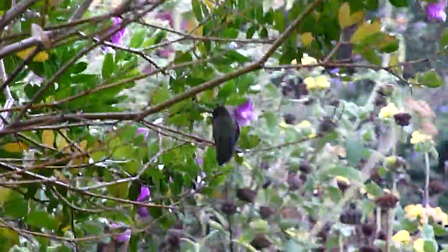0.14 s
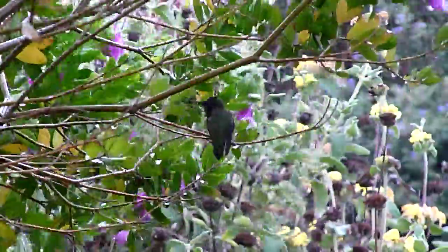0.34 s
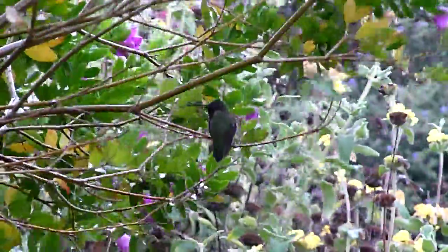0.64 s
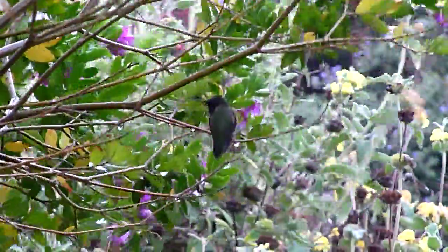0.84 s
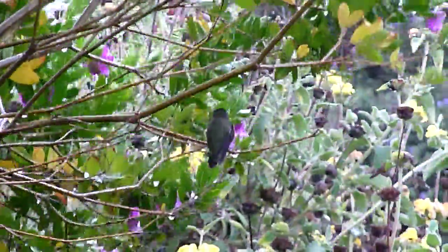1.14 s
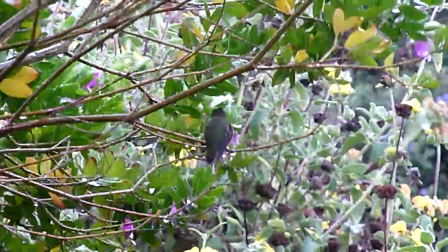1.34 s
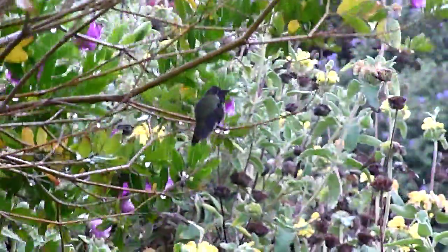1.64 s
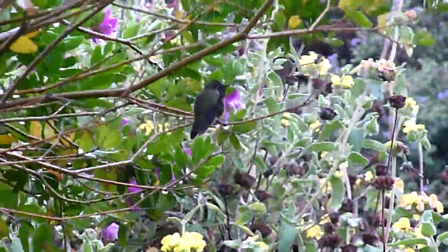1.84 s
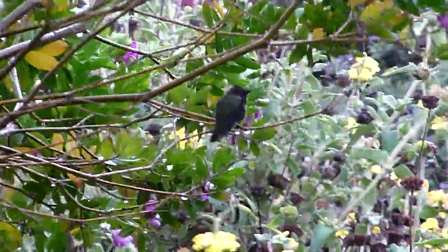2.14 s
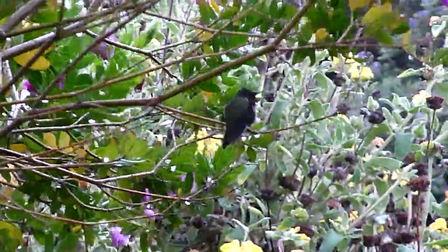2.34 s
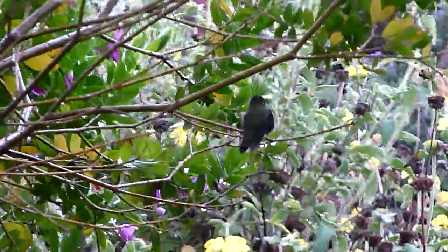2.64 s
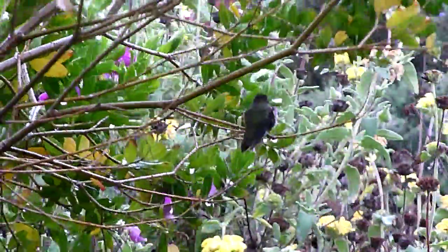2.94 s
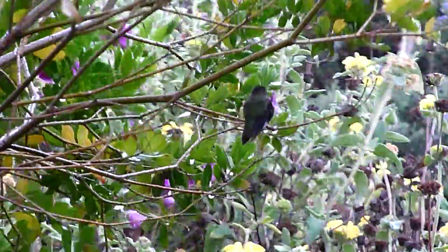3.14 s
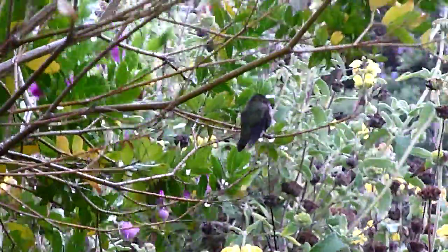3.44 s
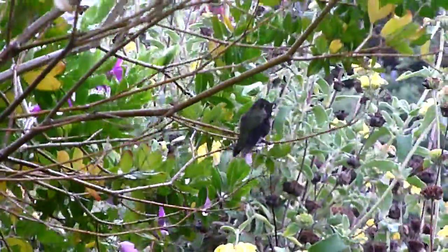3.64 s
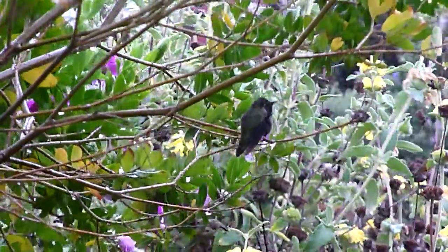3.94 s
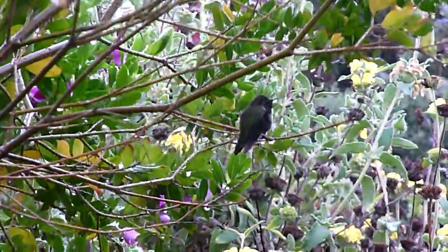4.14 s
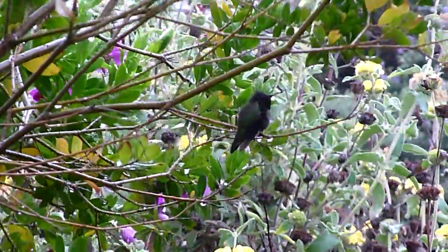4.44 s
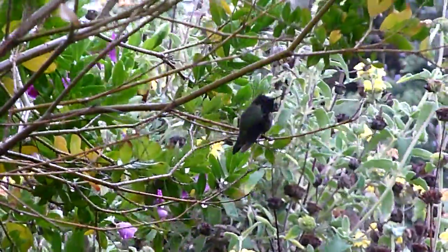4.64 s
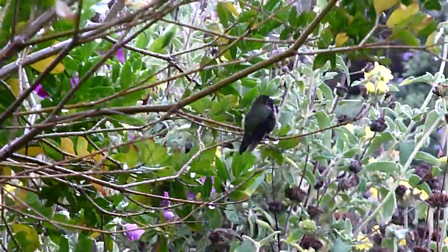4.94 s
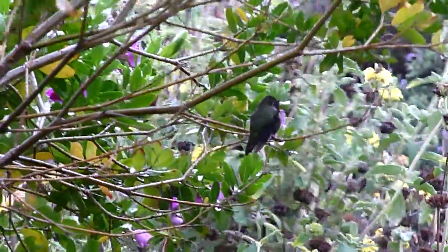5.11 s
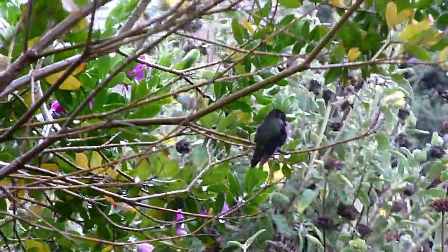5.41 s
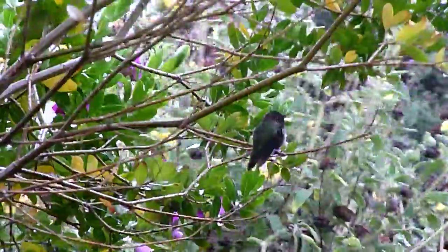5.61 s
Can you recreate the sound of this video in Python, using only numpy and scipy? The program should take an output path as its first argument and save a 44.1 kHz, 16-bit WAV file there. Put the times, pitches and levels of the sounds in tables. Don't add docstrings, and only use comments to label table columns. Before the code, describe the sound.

Kettle steam hisses over a low boiling rumble; broken breathy puffs become a piercing trembling whistle that jumps down and holds, rising gradually.

```python
import sys
import numpy as np
from scipy import signal
from scipy.fft import rfft, irfft, next_fast_len
from scipy.io import wavfile
from scipy.ndimage import uniform_filter1d

SR = 44100
rng = np.random.default_rng(int(sys.argv[2]) if len(sys.argv) > 2 else 0)


def invert_db(level):
    return 10 ** (np.asarray(level, dtype=float) / 20)


def to_wav(sig):
    pcm = np.clip(np.atleast_2d(sig), -1, 1) * 32767
    pcm = np.round(pcm).astype(np.int16)
    wavfile.write(sys.argv[1], SR, pcm.T)


N = 254456

# frequency in Hz, density in dB per Hz.
AIR_COLOUR = [(15, -51), (35, -26), (47, -5), (60, 0), (90, 3.5), (115, -0.5), (190, -19), (300, -27),
              (600, -80.5)]
# pitch in Hz, width in Hz, level in dB.
HUMS = [
    (62.2, 7.5, -61.5),
    (108, 11, -66),
    (142, 8.3, -65.5),
]
# centre in seconds, pitch in Hz, level in dB, half length in seconds.
GURGLES = [(.03, 211, -50.5, .06), (.52, 209, -52, .12), (1.02, 212.4, -50, .06), (1.9, 208.2, -48.5, .06),
           (2.6, 207.7, -51, .15), (3.1, 208.4, -49.5, .05), (3.36, 209, -50.5, .1),
           (3.68, 207.3, -52.5, .09), (4.4, 206.6, -52.5, .16), (5.6, 208, -58.5, .1),
           (.58, 242, -48.5, .2), (1.15, 241, -48, .17), (1.73, 237.7, -52.5, .09), (2.4, 241.6, -55, .2),
           (4.5, 241.8, -53, .18), (5.3, 241, -53.5, .13), (.27, 273, -53, .05), (1.5, 273.6, -51.5, .1),
           (2.25, 270.9, -50, .09), (2.6, 271, -42.5, .06), (3.2, 268.7, -43.5, .05),
           (3.68, 271, -45.5, .07), (2.9, 369.8, -47.5, .07), (2.85, 328, -56, .1), (4.35, 372, -50, .05),
           (5.72, 504, -41, .03)]
# frequency in Hz, density in dB per Hz.
BOIL_COLOUR = [(150, -38.5), (190, -14.5), (205, -2.5), (300, -2.5), (450, 1.5), (600, -4), (690, -6.5),
               (800, -11.5), (1100, -16.5), (1500, -21.5), (2500, -78)]
# start in seconds, depth in dB,
# recovery in seconds.
LULLS = [
    (0.319, 3.5, 0.051),
    (0.9, 2.5, 0.11),
    (1.94, 0.5, 0.43),
    (2.411, 2, 0.11),
    (2.96, 3, 0.2),
    (3.47, 2, 0.15),
    (3.78, 0.5, 0.071),
    (4.21, 6, 0.011),
    (4.998, 1, 0.38),
]
# centre in seconds, lift in dB, half length in seconds.
SWELLS = [
    (1.17, 1, 0.079),
    (2.885, 0, 0.055),
    (3.42, 2, 0.1),
]
# time in seconds, level in dB, jet force from 0 (weak) to 1 (full).
HISS = [(0, -35.5, 0.024), (.3, -36, 0.097), (.8, -35, 0.34), (1.3, -35, 0.31), (1.75, -41.5, 0.84),
        (1.85, -38.5, 0.79), (2.995, -36.5, 0.81), (3.008, -26.5, 0.95), (3.11, -26.5, 0.71),
        (3.14, -30, 0.62), (3.225, -28, 0.5), (3.24, -27.5, 0.72), (3.6, -23.5, 0.82), (4.8, -27.5, 0.8),
        (5.77, -29, 0.84)]
# frequency in Hz, density in dB per Hz.
WEAK_JET = [(700, -15), (1200, -2), (1800, -8), (2100, -12), (2450, -27.5), (2800, -2.5), (3300, 0),
            (3900, -5), (4250, -8.5), (5000, -8.5), (5800, -12), (7000, -26), (7700, -34.5), (8000, -47)]
FULL_JET = [(700, -22.5), (1800, -17.5), (2100, -10.5), (2800, -0.5), (3150, -4), (3900, -1.5), (4400, 7),
            (5600, -3.5), (6100, 1.5), (7000, -0.5), (7450, -18.5), (7800, -25), (8000, -55)]
# centre in seconds, pitch change in %, half length in seconds.
SURGES = [(1.69, 2, 0.0404), (1.825, 3, 0.0249), (1.945, 3, 0.0257), (2.06, 2.5, 0.02944), (2.115, -4, .03),
          (2.25, 1.5, 0.01884), (2.35, -1.5, 0.03986), (2.505, 6, .05), (2.66, -1.5, 0.0404),
          (2.745, 3, .035), (2.81, -1.5, 0.0198), (2.87, 1, .04), (3.44, 4, 0.02575), (3.55, 2, 0.03454),
          (3.635, -3.5, .04), (3.71, 2.17, 0.0381), (4.18, 3.5, .06), (4.38, 2.5, 0.02523), (4.43, -2, .02),
          (4.47, 1.5, .015), (4.55, -2, 0.0251), (5.04, -1.5, .04), (5.215, 3, .04), (5.365, 3, 0.066),
          (5.52, -2.5, .05), (5.62, 1.8, 0.024), (5.665, -1, .02), (5.75, 1, 0.023)]
# start in seconds, low, middle and upper pitch in Hz, middle level in dB.
BREATH = [
    (0, 1221, 2255, 4270, -45),
    (.29, 1434, 2687, 4256, -38),
    (1.35, 1584, 2270, 4540, -60),
    (1.79, 1666, 1980, 4763, -48.5),
    (2.7, 1797, 1992, 5100, -43.5),
]
# centre in seconds, depth in dB, half length in seconds.
LOW_BREATH_GAP = (0.27, 6.1, 0.26)
# time in seconds, pitch in Hz, level in dB.
COMPANION = [
    (3.4, 3109, -55.5),
    (4, 3100, -38.5),
    (4.5, 3083, -38),
    (4.7, 3165, -34),
    (5.2, 3174, -31),
    (5.77, 3085, -33),
]
# time in seconds, pitch in Hz, level in dB.
SLIP = [
    (4.02, 3820, -30),
    (4.04, 3837, -13.5),
    (4.085, 3840, -14),
    (4.12, 3866, -40),
]
# caught in seconds, pitch in Hz, level in dB, held in seconds.
PUFFS = [
    (.295, 3063, -37, 0.011),
    (.392, 3003, -27.5, 0.049),
    (0.514, 3168, -37, 0.019),
    (0.643, 3104, -41.5, 0.012),
    (0.782, 2955, -29.5, 0.032),
    (0.866, 3040, -28, 0.038),
    (0.957, 2980, -26, 0.01),
]
# time in seconds, pitch in Hz, level in dB.
HIGH = [(1.111, 3034, -42), (1.129, 3070, -31), (1.201, 3022, -29.5), (1.249, 2915, -36.5),
        (1.32, 2979, -26.5), (1.37, 3060, -25), (1.39, 3138, -20.5), (1.532, 3048, -23.5),
        (1.782, 3022, -22.5), (1.812, 3219, -19), (2.66, 3191, -20), (3.005, 3473, -17.5),
        (3.02, 3568, -28), (3.116, 3465, -34.5), (3.14, 3333, -19.5), (3.189, 3333, -18),
        (3.231, 3466, -18), (3.255, 3550, -22.5), (3.31, 3480, -26), (3.37, 3480, -36)]
# peak in seconds, peak in dB, pitch in Hz, length in
# seconds.
HIGH_FLARES = [(1.2608, -23.5, 3020, 0.022), (1.2818, -16, 2853, 0.022), (1.3787, -10.5, 3130, 0.02),
               (1.411, -12, 3183, 0.021), (1.4767, -19.5, 3150, 0.022), (1.5866, -17, 3124, 0.022),
               (1.631, -15, 3170, 0.022), (1.757, -11.5, 3011, 0.022), (1.8036, -9.5, 3304, 0.021),
               (1.8792, -1.5, 3124, 0.022), (1.927, -7, 3345, 0.022), (1.9841, -16, 3030, 0.022),
               (2.1495, -10.5, 3185, 0.017), (2.1957, -12.5, 3156, 0.022), (2.2837, -13, 3320, 0.022),
               (2.315, -16, 3155, 0.02), (2.3433, -13, 3216, 0.022), (2.3793, -7.5, 3144, 0.022),
               (2.4157, -16, 3057, 0.022), (2.4757, -13, 3354, 0.022), (2.582, -16.5, 3090, 0.022),
               (2.615, -9.5, 3254, 0.018), (2.666, -8, 3137, 0.025), (2.721, -12, 3510, 0.022),
               (2.7877, -8, 3278, 0.022), (2.83, -2, 3598, 0.022), (2.8653, -7, 3368, 0.017),
               (2.9036, -10.5, 3598, 0.024), (2.9358, -3, 3562, 0.019), (2.975, -13.5, 3470, 0.022),
               (3.0094, -10, 3608, 0.022), (3.053, -11, 3510, 0.022), (3.1494, -10.5, 3470, 0.022),
               (3.1786, -1, 3300, 0.022), (3.2183, -5, 3556, 0.035), (3.259, -18.5, 3600, 0.03)]
# time in seconds, pitch in Hz, level in dB.
LOW = [(2.998, 2320, -39), (3.012, 2337, -24.5), (3.065, 2262, -23), (3.082, 2120, -24.5),
       (3.125, 2100, -27), (3.14, 2070, -28.5), (3.165, 2055, -33.5), (3.228, 2080, -32),
       (3.245, 2140, -25), (3.29, 2173, -22.5), (3.37, 2201, -23), (3.42, 2276, -22), (3.84, 2365, -20.5),
       (3.88, 2274, -22.5), (4.1, 2361, -23), (4.6, 2437, -21.5), (4.9, 2564, -20), (5.77, 2654, -19.5)]
# peak in seconds, peak in dB, octave pitch in Hz, length in
# seconds.
LOW_FLARES = [(3.0054, -13.5, 4715, 0.0256), (3.0588, -5.5, 4510, 0.0234), (3.1052, -9.5, 4210, 0.02),
              (3.2382, -17, 4370, 0.027), (3.2866, -16.5, 4450, 0.031), (3.318, -14, 4390, 0.024),
              (3.3894, -4.5, 4536, 0.0244), (3.485, -8, 4540, 0.02334), (3.566, -12, 4495, 0.018),
              (3.663, -11, 4501, 0.024), (3.73, -9, 4660, 0.025), (3.8622, -9.5, 4680, 0.024),
              (3.8993, -8, 4529, 0.02), (3.936, -9.5, 4625, 0.022), (4.0872, -6, 4622, 0.024),
              (4.1601, -9, 5060, 0.022), (4.2504, -10.5, 4532, 0.0252), (4.452, -8.5, 5060, 0.026),
              (4.5047, -8, 4950, 0.024), (4.5571, -2.5, 4803, 0.019), (4.676, -9, 4910, 0.015),
              (4.7338, -13, 5006, 0.024), (4.7938, -12, 4998, 0.024), (4.89, -14, 5015, 0.024),
              (4.941, -13, 5120, 0.036), (5.018, -6, 5070, 0.026), (5.0606, -18, 5055, 0.022),
              (5.141, -13, 5052, 0.024), (5.1756, -12, 5472, 0.024), (5.2048, -18, 5360, 0.03),
              (5.3472, -17.5, 5495, 0.024), (5.4894, -4, 5154, 0.024), (5.544, -9.5, 5097, 0.024),
              (5.6004, -7.5, 5228, 0.024), (5.643, -8, 5325, 0.024), (5.7218, -9.5, 5610, 0.044),
              (4.119, -6, 5044, .02),
    (4.349, -8.5, 5036, 0.0393),
]
# pitch in Hz, width in
# Hz, lift in dB.
RINGING_MODES = [(209, 9, 11), (241, 10, 13), (271, 10, 8), (328, 23, 7), (372, 23, 9), (588, 88, 6),
                 (749, 14, 5), (875, 19, 6), (1139, 32, 6), (1174, 10, 6), (1314, 34, 9), (1368, 27, 11),
                 (1461, 58, 11), (1575, 35, 12), (1669, 34, 9),
                 (1975, 12, 12), (2017, 10, 9), (2059, 45, 12), (2131, 29, 10), (2222, 27, 10),
               (2315, 100, 6), (2374, 17, 6), (2414, 27, 6), (2463, 18, 8), (2491, 14, 8), (2538, 43, 7),
               (2600, 15, 10), (2693, 10, 7), (2736, 12, 7), (2822, 35, 5), (2924, 10, 6), (2972, 13, 12),
               (3060, 27, 13), (3145, 45, 13), (3232, 10, 4), (3329, 18, 9), (3519, 27, 5), (3558, 19, 6),
               (3594, 21, 10), (3635, 10, 3), (3739, 10, 5), (3787, 34, 4), (3881, 12, 5),
                 (4069, 27, 13), (4160, 20, 11), (4220, 70, 12), (4380, 43, 12), (4449, 18, 12),
                 (4503, 13, 14), (4596, 12, 11), (4677, 33, 9), (4730, 10, 8), (4875, 35, 7),
                 (5025, 59, 11), (5105, 29, 8), (5343, 61, 7), (5464, 28, 10), (5507, 36, 10),
                 (5689, 39, 10), (5729, 18, 11), (5890, 150, 8), (5993, 26, 12), (6171, 22, 10),
                 (6314, 18, 9), (6429, 95, 5), (6587, 14, 7), (6652, 19, 6), (6710, 26, 9), (6757, 15, 7),
                 (6951, 14, 11), (7032, 28, 8), (7116, 23, 6), (7180, 36, 6)]
# frequency in Hz, left-right likeness from 0 to 1.
LIKENESS = [(60, 1), (160, 0.99), (430, 1), (1150, 0.91), (3060, 0.58), (5000, .5), (8190, .6)]
# frequency in Hz, left minus right in dB.
BALANCE = [(60, 1), (160, -0.5), (430, 1.5), (1150, 0.5), (3060, 2), (5000, 1.5), (8190, 0.1)]


def evened(x):
    return x / np.sqrt(np.mean(x ** 2) + 1e-20)


def read(points, hz):
    f, value = np.transpose(points)
    return np.interp(np.log(hz + 1), np.log(f + 1), value)


def columns(rows, fade=0.015):
    s, *cols = np.transpose(rows)
    t = np.arange(N) / SR
    gate = np.clip(np.minimum(t - s[0], s[-1] + fade - t) / fade, 0, 1)
    return gate, *(np.interp(t, s, c) for c in cols)


def bumps(rows):
    t = np.arange(0, N + 32, 32) / SR
    total = sum(height * np.exp(-((t - s) / half) ** 2) for s, height, half in rows)
    return np.interp(np.arange(N) / SR, t, total)


def wander(hz):
    r = np.exp(-2 * np.pi * hz / SR)
    return evened(signal.lfilter([1], np.convolve([1, -r], [1, -r]), rng.standard_normal(N)))


def breathy(hz, width_hz):
    band = wander(width_hz / 2) + 1j * wander(width_hz / 2)
    carrier = np.exp(2j * np.pi * np.cumsum(hz) / SR)
    return evened((band * carrier).real)


def noise(colour_db, patchy_db, flicker_db):
    a, b, patches = rng.standard_normal((3, *colour_db.shape))
    patches = evened(uniform_filter1d(uniform_filter1d(patches, 10, 0), 10, 1))
    flicker = evened(uniform_filter1d(rng.standard_normal(colour_db.shape[1]), 6))
    power = np.mean(invert_db(2 * colour_db), 0)
    level_db = colour_db + patchy_db * patches + flicker_db * flicker
    z = (a + 1j * b) * invert_db(level_db) / np.sqrt(power)
    return evened(signal.istft(z, nperseg=1024, noverlap=768)[1][:N])


def room_floor():
    hz = np.fft.rfftfreq(1024, 1 / SR)
    air = noise(np.outer(read(AIR_COLOUR, hz), np.ones(N // 256 + 5)), patchy_db=-2.0, flicker_db=3.0)
    air = signal.sosfilt(signal.butter(4, 45, "high", fs=SR, output="sos"), air)
    hums = sum(invert_db(db) * breathy(np.full(N, f), width) for f, width, db in HUMS)
    return invert_db(-58) * air + hums


def gurgles():
    t, out = np.arange(N) / SR, np.zeros(N)
    drift = np.cumsum(3.0 * wander(6.6)) / SR
    for (at, hz, db, half), start in zip(GURGLES, rng.random(len(GURGLES))):
        near = slice(max(int((at - 3 * half) * SR), 0), int((at + 3 * half) * SR))
        swell = invert_db(db + 5.0) * np.exp(-((t[near] - at) / half) ** 2)
        out[near] += swell * np.sin(2 * np.pi * (hz * t[near] + drift[near] + start))
    return out


def boil_db():
    t = np.arange(N) / SR
    break_s, sink_from_s, sink_db_per_s = 0.019, 2.38, 1.5
    lulls = 0
    for s, db, recovery in LULLS:
        onset = np.clip((t - s) / break_s + 1, 0, 1)
        lulls = lulls + db * onset * np.exp(-np.maximum(t - s, 0) / recovery)
    return -36 - sink_db_per_s * np.maximum(t - sink_from_s, 0) - lulls + bumps(SWELLS)


def steam_and_boil():
    hz, t = np.fft.rfftfreq(1024, 1 / SR), np.arange(N // 256 + 5) * 256 / SR
    s, _, force = np.transpose(HISS)
    force = np.clip(np.interp(t, s, force), 0, 1)
    colour_db = np.outer(read(WEAK_JET, hz), 1 - force) + np.outer(read(FULL_JET, hz), force)
    tone_s, tone_hz = np.transpose(LOW)[:2]
    below = (.9 * np.interp(t, tone_s, tone_hz) - hz[:, None]) / 120
    colour_db -= 5 * force ** 3 / (1 + np.exp(-np.clip(below, -30, 30)))
    hiss = invert_db(columns(HISS)[1]) * noise(colour_db, patchy_db=2.0, flicker_db=1.3)
    rumble = noise(np.outer(read(BOIL_COLOUR, hz), 1 + 0 * t), patchy_db=0.5, flicker_db=0.5)
    rumble = signal.sosfilt(signal.butter(6, 195, "high", fs=SR, output="sos"), rumble)
    return hiss + invert_db(boil_db() - 1.5) * rumble


def breath():
    t, table = np.arange(N) / SR, np.transpose(BREATH)
    step_s, end_s, narrow_until_s = .06, 3.04, BREATH[2][0]
    step = int(step_s * SR)
    start, *held = table[:, np.maximum(np.searchsorted(table[0], t) - 1, 0)]
    low_hz, mid_hz, top_hz, mid_db = uniform_filter1d(held, step)
    creep = 1 + .02 * uniform_filter1d(t - start, step)
    push = creep * (1 + bumps(SURGES) / 100)
    gate = np.clip((end_s - t) / step_s, 0, 1)
    low = invert_db(-41 - bumps([LOW_BREATH_GAP])) * breathy(low_hz * push, 460)
    middle = invert_db(mid_db) * breathy(mid_hz * creep, 340)
    locked = uniform_filter1d(1. * (t > narrow_until_s), step)
    early_db = -7.5 * np.clip((0.31 - t) / step_s, 0, 1)
    narrow, wide = breathy(top_hz * push, 256), breathy(top_hz * push, 600)
    top = invert_db(-37 + early_db) * ((1 - locked) * narrow + locked * wide)
    return gate * (low + middle + top)


def companion():
    gate, hz, level_db = columns(COMPANION)
    return gate * invert_db(level_db) * breathy(hz, 530)


def jet(hz, shake, shake_hz, flutter_db):
    bounded = evened(np.tanh(wander(shake_hz)))
    phase = 2 * np.pi * np.cumsum(hz * (1 + shake * bounded)) / SR
    return phase, np.sqrt(2) * evened(invert_db(flutter_db * wander(85)))


def flares(rows, hz):
    t, table, rise_s = np.arange(N) / SR, np.transpose(sorted(rows)), .002
    latest = np.maximum(np.searchsorted(table[0], t + rise_s) - 1, 0)
    s, peak_db, to_hz, length = table[:, latest]
    share = np.clip((t - s) / rise_s + 1, 0, 1) * np.exp(-((t - s) / length) ** 2)
    pull = .75 * share * np.clip(to_hz - hz, -.06 * hz, 0.051 * hz)
    extra_db = share * (peak_db - table[1].mean())
    share, extra_db, pull = uniform_filter1d([share, extra_db, pull], size=100)
    return share, 0.24 * extra_db, hz + pull


def slip():
    gate, hz, tone_db = columns(SLIP)
    phase, swing = jet(hz, shake=.014, shake_hz=130, flutter_db=3.5)
    return gate * swing * invert_db(tone_db - 6.5) * (np.sin(phase) + invert_db(-8.5) * np.sin(.93 * phase))


def high_rows():
    catch_s, dying_s, murmur_db, sag = 0.013, 0.027, -45.5, .012
    rows = [(.2, PUFFS[0][1], murmur_db - 9.5)]
    for s, hz, db, held in PUFFS:
        end = s + held
        rows += [(s - catch_s, hz, murmur_db), (s, hz, db)]
        rows += [(end, hz, db), (end + dying_s, hz * (1 - sag), murmur_db)]
    return sorted(rows) + HIGH


def high_tone():
    gate, hz, tone_db = columns(high_rows())
    surge = bumps(SURGES)
    hz, tone_db = hz * (1 + surge / 100), tone_db + .5 * surge
    flare, extra_db, hz = flares(HIGH_FLARES, hz)
    tone_db += 2.5 * (flare - .5) + extra_db
    octave_db = np.minimum(tone_db - 4, -30.5 + 0.2 * (tone_db + 18.5))
    shake = .033 * np.clip((tone_db + 40) / 18, .5, 1) * (1 - .35 * flare)
    phase, swing = jet(hz, shake, shake_hz=150, flutter_db=2.4)
    locked = swing * (invert_db(tone_db - 2.0) * np.sin(phase) + invert_db(octave_db - 7.0) * np.sin(2 * phase))
    halo = invert_db(tone_db - 10.5) * breathy(1.05 * hz, 160) + invert_db(octave_db - 11.5) * breathy(1.8 * hz, 500)
    fringe = invert_db(tone_db - 19.5) * breathy(1.14 * hz, 300)
    return gate * (locked + halo + fringe)


def low_tone():
    gate, hz, tone_db = columns(LOW)
    surge, since = bumps(SURGES), np.arange(N) / SR - LOW[0][0]
    octave_db = -19 + 2.4 * np.minimum(tone_db + 22.5, 0) - 0.53 * since
    octave_db += 0.55 * surge
    hz, tone_db = hz * (1 + surge / 100), tone_db + 0.6 * surge
    flare, extra_db, octave_hz = flares(LOW_FLARES, 2 * hz)
    pull = octave_hz / 2 - hz
    tone_follows = .2
    hz, tone_db = hz + tone_follows * pull, tone_db + 1 * (flare - .5)
    octave_db += 1.5 * (flare - .5) + extra_db
    shake = .02 * np.clip((-tone_db - 14) / 8, 1, 1.5) * (1 - .35 * flare)
    phase, swing = jet(hz, shake, shake_hz=120, flutter_db=2.2)
    upper_phase = phase + 2 * np.pi * np.cumsum((1 - tone_follows) * pull) / SR
    trade = invert_db(2.2 * wander(40))
    locked = invert_db(tone_db - 5.0) * np.sin(phase) * trade
    locked += invert_db(octave_db - 3.5) * np.sin(2 * upper_phase) / trade
    locked += invert_db(octave_db - 24) * np.sin(3 * upper_phase)
    halo = invert_db(tone_db - 8.5) * breathy(hz, 240)
    halo += invert_db(octave_db - 7.5) * breathy(1.95 * hz, 530)
    halo += invert_db(octave_db - 24.0) * breathy(3.05 * hz, 500)
    return gate * (swing * locked + halo)


def kitchen(x, t60=0.21, tail_db=-11, start=0.0054):
    size = next_fast_len(N + SR)
    hz, t = np.fft.rfftfreq(size, 1 / SR), np.arange(SR // 2) / SR
    modes = RINGING_MODES
    ring = 1 + sum((invert_db(db) - 1) / (1 + 2j * (hz - f) / width) for f, width, db in modes)
    ring /= uniform_filter1d(abs(ring), size=3200)
    taps = rng.standard_normal((2, len(t))) * invert_db(-60 * t / t60) * (t > start)
    common, own = rfft(taps / np.linalg.norm(taps[0]), size)
    sides = np.array([[1], [-1]])
    spread = np.sqrt(1 - np.clip(read(LIKENESS, hz), 0, 1) ** 2) * sides
    path = ring * (1 + invert_db(tail_db) * common) + 0.69 * spread * own
    balance = invert_db(read(BALANCE, hz) / 2 * sides)
    return irfft(rfft(x, size) * path * balance, size)[:, :N]


def scene():
    sinking = invert_db(0.9 * uniform_filter1d(boil_db() + 39.5, size=20000))
    background = sinking * room_floor() + gurgles()
    kettle = steam_and_boil() + breath() + companion() + slip() + low_tone() + high_tone()
    return invert_db(0.88) * kitchen(background + kettle)


def top_cut(x):
    return signal.sosfilt(signal.butter(12, 8790, fs=SR, output="sos"), x)


def record(dry):
    low_pass = signal.firwin(201, 7750, window=("kaiser", 7), fs=SR)
    kept = signal.oaconvolve(dry, low_pass[None], "same")
    mirrored = kept * np.cos(2 * np.pi * 16000 * np.arange(N) / SR)
    leak = signal.firwin(201, [8050, 8680], pass_zero=False, window=("kaiser", 7), fs=SR)
    image = invert_db(-6) * signal.oaconvolve(mirrored, leak[None], "same")
    return top_cut(kept + image)


dry = scene()
out = record(dry)
to_wav(out)
```